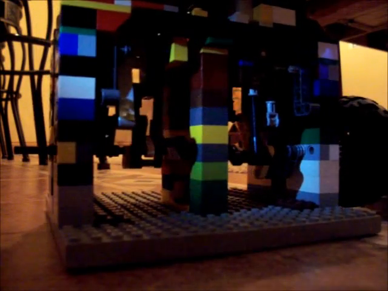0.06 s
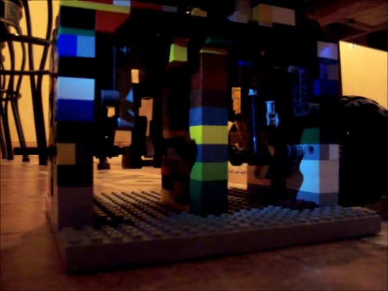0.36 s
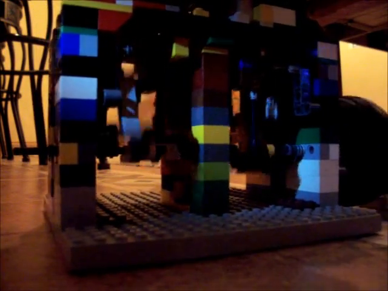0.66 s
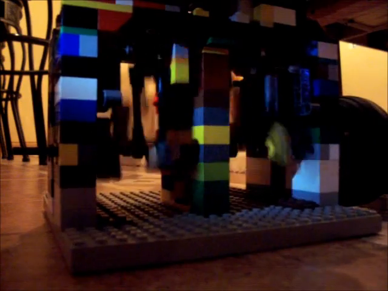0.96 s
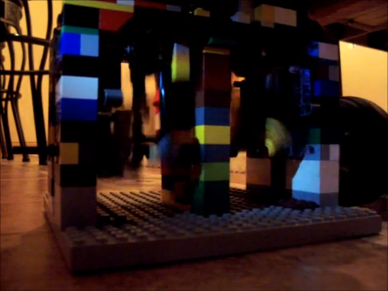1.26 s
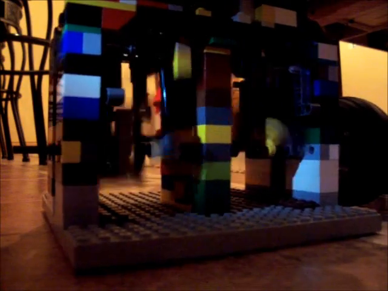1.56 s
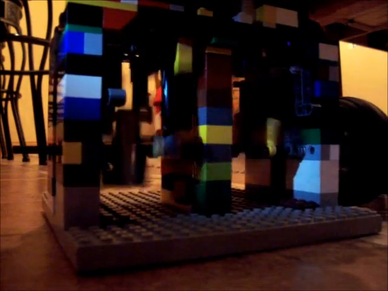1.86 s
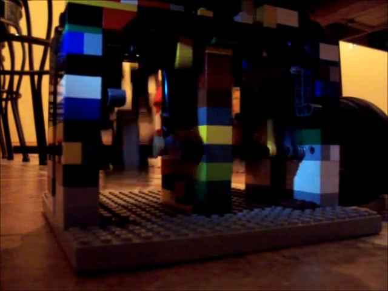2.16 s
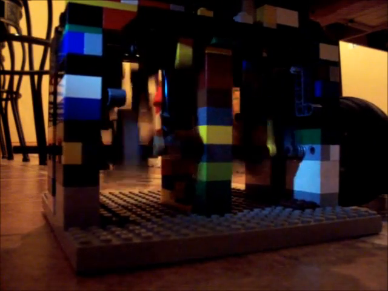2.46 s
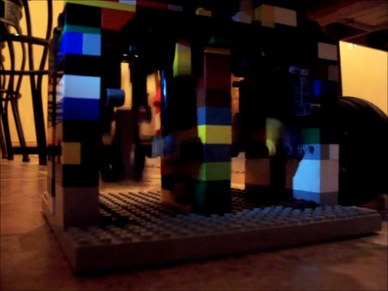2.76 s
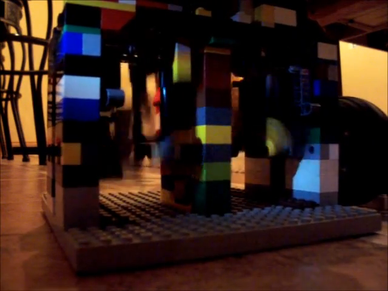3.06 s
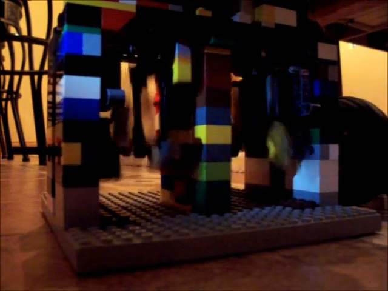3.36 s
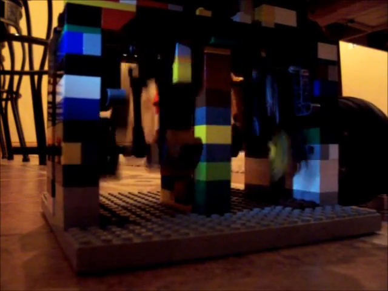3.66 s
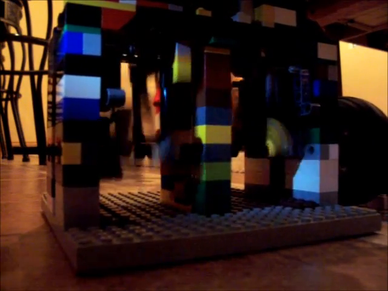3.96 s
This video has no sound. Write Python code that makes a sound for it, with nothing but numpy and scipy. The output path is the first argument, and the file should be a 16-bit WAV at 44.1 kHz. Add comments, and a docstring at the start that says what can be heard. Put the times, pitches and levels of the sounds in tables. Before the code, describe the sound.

Air rushes through a toy brick engine, close by in a small room. A suction motor hums and a leak whistles briefly, then a surge starts the engine, which runs with a steady hissing roar, light rattles and soft puffs.

```python
"""A toy brick engine running on the air of a suction motor, close to the microphone in a small room.
At first it stands still: over the motor's hum, air seeps through the bricks and leaks through a
narrowing gap, then chokes. With a surge the crank starts to turn: air roars in the hollow housing and
rushes between the bricks, the valve hisses, loose bricks rattle lightly and the pistons puff."""
import sys
import numpy as np
from scipy import signal
from scipy.fft import rfft, irfft
from scipy.io import wavfile

SR = 44100
rng = np.random.default_rng(int(sys.argv[2]) if len(sys.argv) > 2 else 0)


def store_wav(level_fs):
    """Save 16-bit WAV to argv[1]."""
    pcm = np.round(np.clip(np.atleast_2d(level_fs), -1, 1) * 32767)
    wavfile.write(sys.argv[1], SR, pcm.T.astype(np.int16))


N = 176400
TIME = np.arange(N) / SR


def amp(db):
    """Decibels to gain."""
    return 10 ** (np.asarray(db) / 20)


def unit(x):
    """Scales to an rms of one."""
    return x / np.sqrt(np.mean(x ** 2) + 1e-20)


def curve(rows, column=1):
    """One column of a table, joined over time."""
    rows = np.array(rows)
    return np.interp(TIME, rows[:, 0], rows[:, column])


def colour(x, spectrum):
    """Filters by rows of frequency_hz, relative_db, to an rms of one."""
    hz, db = np.transpose(spectrum)
    gain = amp(np.interp(np.log(np.fft.rfftfreq(N, 1 / SR) + 1), np.log(hz), db))
    return unit(irfft(rfft(x) * gain, N))


def air(spectrum):
    """Turbulent air with a given spectrum."""
    return colour(rng.standard_normal(N), spectrum)


def wander(rate_hz):
    """Random drift, mostly slower than the given rate."""
    rolloff = 1 + (np.fft.rfftfreq(N, 1 / SR) / rate_hz) ** 4
    return unit(irfft(rfft(rng.standard_normal(N)) / rolloff, N))


def whistle(hz, width_hz):
    """Air ringing in a steep resonance that may glide."""
    pole = np.exp(-np.pi * width_hz / SR)
    noise = rng.standard_normal(N) + 1j * rng.standard_normal(N)
    for _ in range(2):
        noise = signal.lfilter([1 - pole], [1, -pole], noise)
    carrier = np.exp(2j * np.pi * np.cumsum(hz * np.ones(N)) / SR)
    return unit((noise * carrier).real)


def sine(hz):
    """A tone of rms one that follows a pitch."""
    return np.sqrt(2) * np.sin(2 * np.pi * (np.cumsum(hz * np.ones(N)) / SR + rng.random()))


# The shaft, speeding up as the engine starts: time_s, speed_hz
SHAFT_SPEED = [(0, 404.3), (.42, 405.2), (.56, 405.2), (.7, 410), (.9, 414.9), (4, 414.8)]
# Shaft hum and fan whine: time_s, hum_db, whine_db
MOTOR_LEVELS = [(0, -28.5, -36), (.4, -28.5, -39), (.44, -40, -46), (.49, -29.5, -43), (.57, -26.5, -39),
                (.66, -31.5, -42), (.73, -39, -43), (.85, -41.5, -37), (2.4, -47.5, -40.5), (4, -57, -47.5)]
# Mains hum: pitch_hz, level_db
MAINS_TONES = [(120, -54), (240.3, -47)]


def suction_motor(fan_blades=6, waver=.0005, flicker_db=1.3):
    """The shaft hums and the passing fan blades whine, over a steady mains hum."""
    shaft_hz = curve(SHAFT_SPEED) * (1 + waver * wander(rate_hz=12))
    hum = sine(shaft_hz) * amp(curve(MOTOR_LEVELS) + flicker_db * wander(rate_hz=20))
    whine = sine(fan_blades * shaft_hz)
    whine *= amp(curve(MOTOR_LEVELS, column=2) + flicker_db * wander(rate_hz=17))
    return hum + whine + sum(amp(db) * sine(hz) for hz, db in MAINS_TONES)


# Air through the standing engine: frequency_hz, relative_db
SEEP_SPECTRUM = [(30, -35), (100, -13), (160, -14.5), (240, 2.5), (305, -6.5), (420, 2.5), (520, -5),
                 (800, -2.5), (1100, -4.5), (1350, -11), (1600, -10), (2200, -10.5), (2500, -4),
                 (2850, -3.5), (3200, -13), (3700, -6.5), (4100, -11), (4500, -2), (5000, -5), (5750, 2),
                 (6300, -5), (7200, -4), (7600, -7), (8000, -29.5)]
# Its flow: time_s, level_db
SEEP_FLOW = [(0, -20), (.15, -22), (.3, -20), (.41, -20.5), (.445, -27.5), (.48, -31), (.53, -28),
             (.6, -25.5), (.68, -27.5), (.8, -46), (.9, -78.5)]


def seeping_air():
    """Air seeps through the bricks while the engine stands still."""
    return air(SEEP_SPECTRUM) * amp(curve(SEEP_FLOW))


# The leak: time_s, pitch_hz, level_db
LEAK_PATH = [(0, 7200, -44), (.07, 7330, -27), (.13, 5740, -28), (.28, 5900, -25), (.36, 6390, -24.5),
             (.41, 6590, -19), (.448, 6750, -17), (.465, 6620, -30.5), (.55, 6590, -27.5),
             (.66, 7100, -24.5), (.8, 7100, -57), (.9, 7080, -77)]


def gap_leak(width_hz=1300, flutter_hz=125.5, flutter_depth=.18):
    """A breathy, fluttering whistle dips in pitch, then rises as the gap closes."""
    leak = whistle(curve(LEAK_PATH), width_hz) * unit(1 + flutter_depth * sine(flutter_hz))
    treble_lift = [(3000, -19.5), (5000, -7), (5700, -1), (7300, 3.5), (8000, -13)]
    return colour(leak, treble_lift) * amp(curve(LEAK_PATH, column=2))


# The surge: frequency_hz, relative_db
SURGE_SPECTRUM = [(30, -30), (110, -11.5), (240, -1), (400, -3.5), (550, -4.5), (800, 2), (1100, -3),
                  (1500, -10.5), (2400, -6.5), (3300, -12), (5000, -11.5), (7000, -7.5), (8000, -28)]
# Its swell and fall: time_s, level_db
SURGE_LEVELS = [(.45, -80), (.53, -29), (.62, -24), (.7, -19), (.77, -29.5), (.87, -58), (1, -87)]


def starting_surge():
    """Air surges through as the crank starts to turn."""
    return air(SURGE_SPECTRUM) * amp(curve(SURGE_LEVELS))


# Air through the running engine: time_s, roar_db, rush_db, hiss_db
RUNNING_FLOW = [(.62, -62, -63.5, -63), (.7, -41, -31.5, -21), (.755, -30.5, -21, -19.5),
                (.9, -31.5, -23.5, -21.5), (1.3, -31, -22.5, -21.5), (1.7, -33, -23, -21),
                (1.95, -31.5, -22, -21), (2.15, -33, -24.5, -21.5), (2.38, -30, -22, -22.5),
                (2.45, -30.5, -22.5, -22.5), (2.85, -31, -22, -23), (3.3, -31, -22, -23),
                (3.7, -31, -23, -23), (4, -31, -21.5, -22.5)]
# The low roar: frequency_hz, relative_db
ROAR_SPECTRUM = [(25, -41.5), (45, -21), (65, -23.5), (90, -14), (145, -13), (200, -2), (262, -1),
                 (305, -6), (360, -3), (440, -2), (540, -3), (680, -3.5), (790, 0.5), (930, -4),
                 (1040, -2.5), (1110, -6), (1230, -4.5), (1300, -16), (2000, -24), (4000, -63.5)]
# Resonances of hose and housing at the median roar: pitch_hz, width_hz, level_db
HOLLOW_MODES = [(244, 20, -43), (257.7, 12, -46.5), (350.6, 14, -46.5), (378, 10, -47), (410, 6.5, -48.5),
                (445, 16, -43.5), (493, 12, -47.5), (597, 25, -50), (722, 12, -50.5), (833, 22, -46),
                (1018, 23, -46), (1174, 25, -50.5), (1228, 33, -44.5), (1558, 12, -49)]


def housing_roar():
    """Air roars through hose and housing, whose hollows ring in step with the flow."""
    roar_db = curve(RUNNING_FLOW)
    hollows = sum(amp(db) * whistle(hz, width_hz) for hz, width_hz, db in HOLLOW_MODES)
    return air(ROAR_SPECTRUM) * amp(roar_db) + hollows * amp(roar_db - np.median(roar_db))


# The bright rush: frequency_hz, relative_db
RUSH_SPECTRUM = [(300, -36), (900, -26.5), (1400, -8.5), (1900, -7), (2350, -9), (2600, -2.5), (2880, -1.5),
                 (3200, -10.5), (3500, -4), (3770, -0.5), (4100, -7.5), (4500, -5), (4950, 5), (5250, 0),
                 (5550, -1), (5880, 5.5), (6250, 2.5), (7000, -2.5), (7600, -1.5), (8000, -26)]


def brick_rush(grain_db=.67):
    """Air rushes between the bricks with a fine grain."""
    rush = air(RUSH_SPECTRUM) * amp(curve(RUNNING_FLOW, column=2))
    return rush * unit(amp(grain_db * wander(rate_hz=98)))


# The thin hiss: frequency_hz, relative_db
VALVE_SPECTRUM = [(3000, -69.5), (5800, -26.5), (6400, -10.5), (6680, -3.5), (6860, 1), (7190, 0),
                  (7500, -7.5), (7750, -15), (8000, -32.5), (8300, -55)]


def valve_hiss(sputter_db=1.1):
    """Air sputters through the valve."""
    hiss = air(VALVE_SPECTRUM) * amp(curve(RUNNING_FLOW, column=3))
    return hiss * unit(amp(sputter_db * wander(rate_hz=130)))


# Tone of both ticks and puffs: frequency_hz, relative_db
CRANK_SPECTRUM = [(100, -36.5), (400, 3.5), (900, -14), (1400, -1.5), (2000, 0.5), (2750, 1), (3200, -1),
                  (3800, 0.5), (4800, 4), (6000, -4.5), (7200, -7), (8000, -31)]


def brick_rattle(ticks_per_s=160, decay_s=.002, gain_db=-39):
    """Loose bricks tick as the crank turns, in step with the level of the rush."""
    knocks = (rng.random(N) < ticks_per_s / SR) * rng.random(N)
    decays = signal.lfilter([1], [1, -np.exp(-1 / (decay_s * SR))], knocks)
    ticks = colour(decays * rng.standard_normal(N), CRANK_SPECTRUM)
    return amp(gain_db) * ticks * unit(amp(curve(RUNNING_FLOW, column=2)))


# Piston strokes: peak_s, level_db
PISTON_STROKES = [(1.0, -32.5), (1.15, -30), (1.27, -32), (1.42, -32.5), (1.58, -33), (1.75, -35),
                  (1.869, -36), (2.04, -36), (2.22, -39), (2.38, -29), (2.6, -33.5), (2.811, -28.5),
                  (2.91, -29), (3.07, -29), (3.22, -31.5), (3.36, -30.5), (3.49, -27.5), (3.64, -30),
                  (3.79, -30), (3.95, -31.5)]


def piston_puffs(width_s=.026):
    """Each stroke lets a soft puff of air through."""
    swells = sum(amp(db) * np.exp(-.5 * ((TIME - s) / width_s) ** 2) for s, db in PISTON_STROKES)
    return air(CRANK_SPECTRUM) * swells


def room(x, t60_s, wet_db):
    """Short, scattered reflections reach the microphone just after the direct sound."""
    t = TIME[:SR // 2]
    tail = rng.standard_normal(len(t)) * np.exp(-np.log(1000) * t / t60_s) * (t > .003)
    return x + amp(wet_db) * signal.fftconvolve(x, tail / np.linalg.norm(tail))[:N]


def scene(gust_db=.35):
    """Motor and engine close by in the small room, the same in both channels."""
    starting = gap_leak() + seeping_air() + starting_surge()
    running = (housing_roar() + brick_rush() + valve_hiss()) * amp(gust_db * wander(rate_hz=18))
    mix = room(starting + running, t60_s=.14, wet_db=-17.5) + suction_motor()
    mix += room(brick_rattle() + piston_puffs(), t60_s=.16, wet_db=-6)
    return np.array([mix, mix])


def record(dry):
    """The recorder cuts the treble steeply above its band limit."""
    lowpass = signal.firwin(601, cutoff=8230, window=("kaiser", 9), fs=SR)
    return signal.oaconvolve(dry, lowpass[None], "same")


dry = scene()
out = record(dry)
store_wav(out)
```